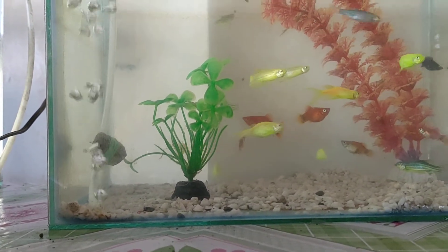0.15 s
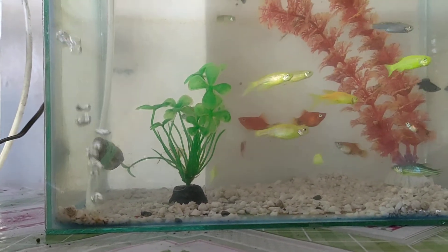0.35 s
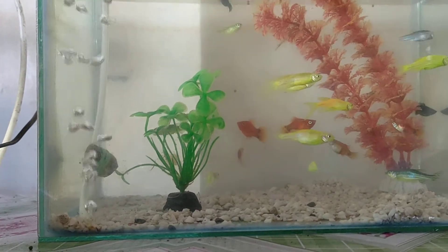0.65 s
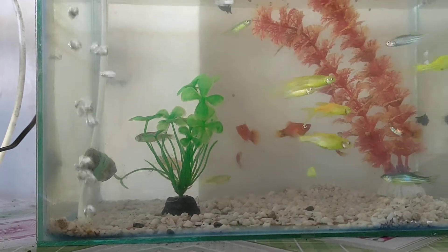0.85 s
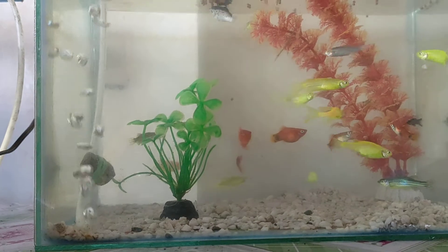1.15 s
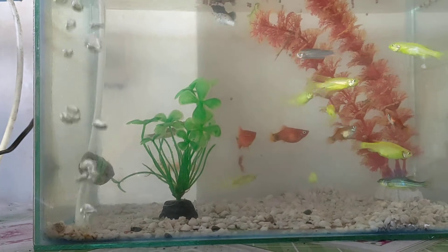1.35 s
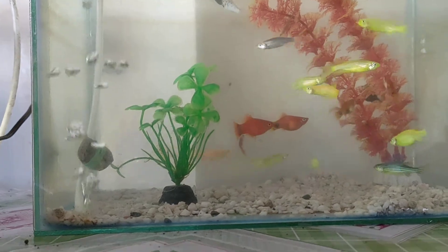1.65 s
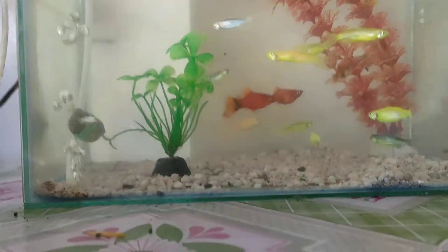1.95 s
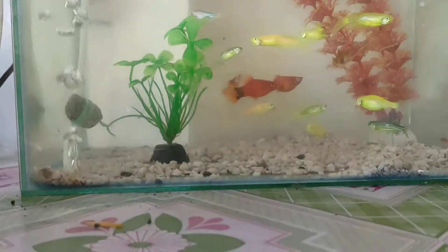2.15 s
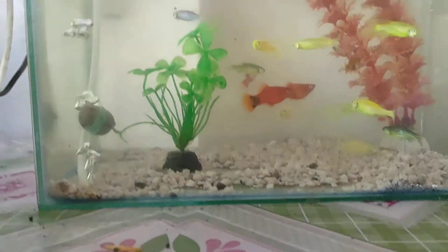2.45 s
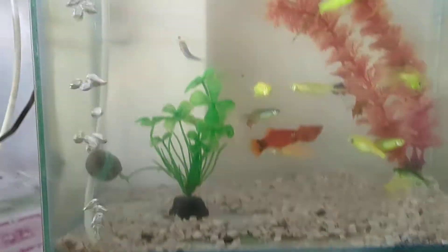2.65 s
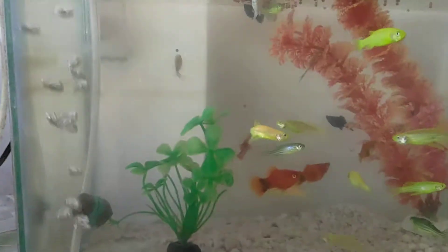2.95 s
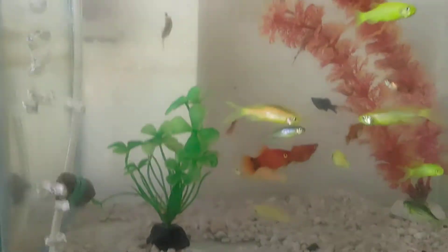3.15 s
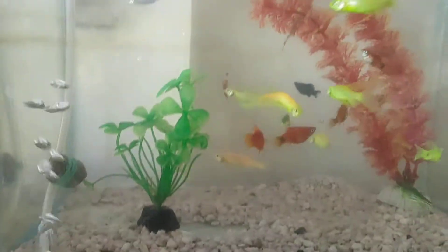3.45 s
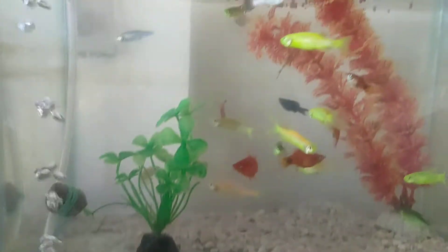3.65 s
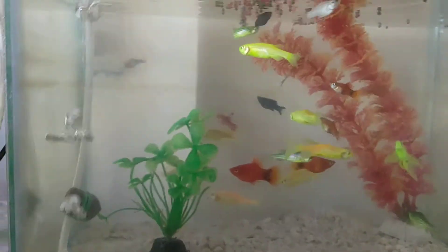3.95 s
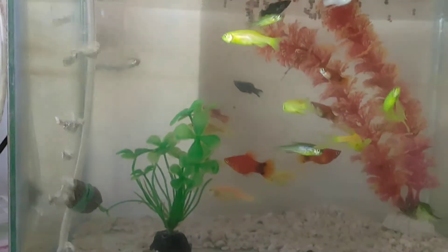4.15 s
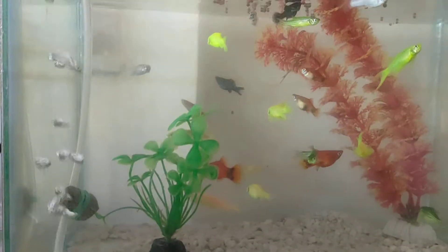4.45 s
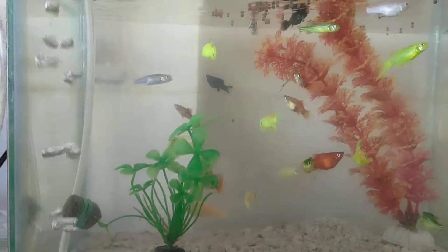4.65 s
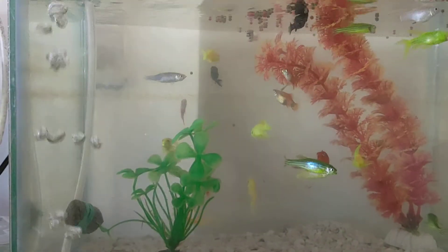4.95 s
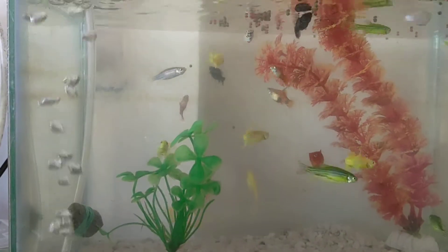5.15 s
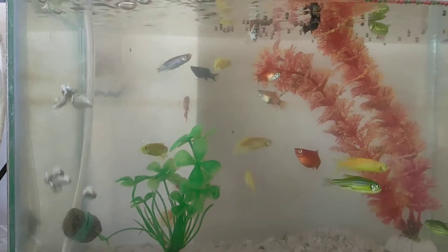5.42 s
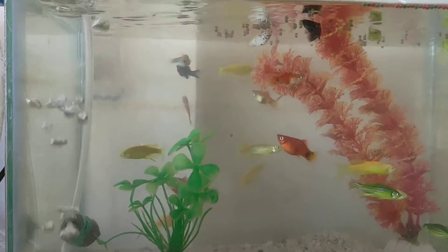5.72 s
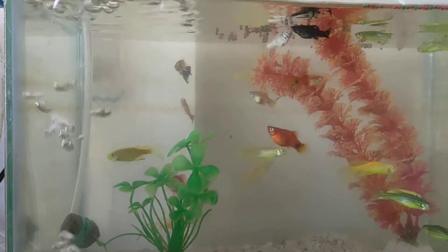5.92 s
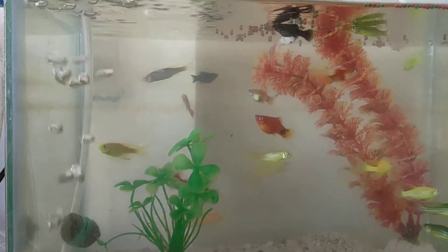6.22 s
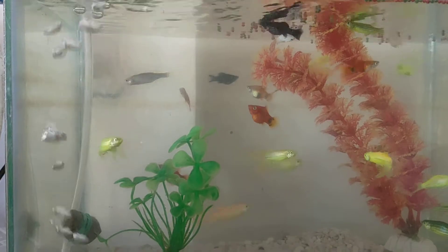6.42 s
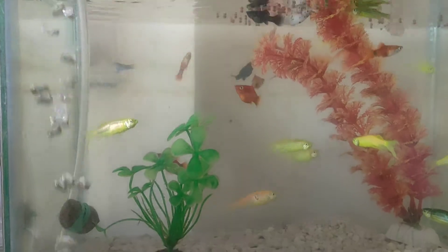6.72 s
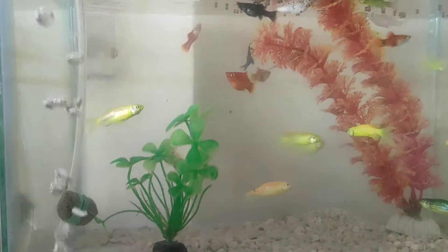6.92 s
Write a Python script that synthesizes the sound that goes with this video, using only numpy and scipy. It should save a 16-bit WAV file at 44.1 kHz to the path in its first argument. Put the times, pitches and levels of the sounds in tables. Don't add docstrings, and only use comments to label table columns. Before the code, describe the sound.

Close handheld stereo pickup at an aquarium: a constant mains-rate pump buzz dominates, with a humming casing, thin rattling shell and high valve clicking. Quiet bubbling and breathy rushing blend behind it. Several loud dry clicks from a finger on the microphone come early, the first briefly ducking the sound, and a soft last one follows around the middle. The buzz then continues, brighter and steady, to the end.

```python
import sys
import numpy as np
from scipy import signal
from scipy.fft import rfft, irfft, next_fast_len
from scipy.io import wavfile
from scipy.ndimage import uniform_filter1d

SR = 44100
rng = np.random.default_rng(int(sys.argv[2]) if len(sys.argv) > 2 else 0)


def digitize_waveform(pressure):
    field = np.atleast_2d(pressure).T
    bounded = np.clip(field, -1, 1)
    quanta = np.round(bounded * 32767).astype(np.int16)
    wavfile.write(sys.argv[1], SR, quanta)


def level_to_linear(level):
    exponent = np.asarray(level, float) / 20
    return 10 ** exponent


N = 312228

MAINS_HZ = 59.8959
START_TURN, KNOCK_TURN = -.004, -.016


def rms_one(x):
    return x / np.sqrt(np.mean(x ** 2) + 1e-20)


def at_hz(points, hz):
    point_hz, value = np.transpose(points)
    return np.interp(np.log(hz), np.log(point_hz + 1), value)


def pan(side_db):
    return level_to_linear(np.multiply.outer([.5, -.5], side_db))


def drift(rate_hz):
    r = np.exp(-80 * np.pi * rate_hz / SR)
    noise = rng.standard_normal(N // 40 + 2002)
    slow = signal.lfilter([1], [1, -2 * r, r * r], noise)[2000:]
    return np.interp(np.arange(N) / 40, np.arange(len(slow)), rms_one(slow))


# start_s, height (0 to 1), turn (-1 to 1, left is plus),
# step (0 to 1, towards the glass)
HAND_PATH = [(0.1, 0.03, .6, .02), (0.9, 0, 0.82, 0.2), (1.6, 0.14, 1, 0.16), (1.92, 0.03, 0.78, 0),
             (2.1, 0.28, 0.91, 0.1), (2.4, 0.2, -0.15, 0.2), (2.6, 0.48, -1.06, 0.2),
             (2.85, 0.43, -0.82, .7), (3.07, 0.05, -0.3, 0.93), (3.55, 0.42, -0.66, 0.93),
             (3.95, 0.76, -0.038, 0.73), (4.25, 0.83, -0.16, 0.46), (4.9, 0.89, -0.1, 0.36),
             (5.5, 0.89, -0.25, 0.28), (6.25, 0.89, -0.41, 0.3), (7.08, 1, -0.39, 0.34)]


def follows_hand(rest, per_height, per_turn, per_step):
    start_s, height, turn, step = np.transpose(HAND_PATH)
    value = rest + per_height * height + per_turn * turn + per_step * step
    return np.interp(np.arange(N) / SR, start_s, value)


def nook(x, t60_s, wet_db):
    age = np.arange(int(.12 * SR)) / SR
    tails = rng.standard_normal((2, 2, len(age))) * level_to_linear(-60 * age / t60_s) * (age > .002)
    tails /= np.sqrt(np.sum(tails ** 2, axis=2, keepdims=True))
    here, there = (signal.oaconvolve(x, tail, axes=1)[:, :N] for tail in tails)
    moved = 1.52 * np.arange(N) / SR + drift(0.28)
    wet = x + level_to_linear(wet_db) * (np.cos(moved) * here + np.sin(moved) * there)
    return wet / np.sqrt(np.mean(wet.mean(axis=0) ** 2))


def fan():
    level = np.sqrt(2) * level_to_linear(-46.5 + 0.51 * drift(1.2))
    return level * np.sin(2 * np.pi * 58.1 * np.arange(N) / SR)


def gurgle(bubbles_per_s, level_db):
    born = rng.random(N) < bubbles_per_s * level_to_linear(5 * drift(2.5)) / SR
    sizes = level_to_linear(2.0 * np.minimum(rng.exponential(1, N), 4)) * born
    pitch_group = rng.integers(0, 10, N)
    out = 0
    for k, hz in enumerate(np.geomspace(110, 700, 10)):
        r, w = level_to_linear(-60 * hz / (14.0 * SR)), 2 * np.pi * hz / SR
        hits = sizes * (pitch_group == k) + 1e-18
        out = out + signal.lfilter([0, np.sin(w)], [1, -2 * r * np.cos(w), r * r], hits)
    dull = signal.lfilter([.05], [1, -.95], out)
    return level_to_linear(level_db) * rms_one(dull)


# pitch_hz, likeness (1 same, 0 unrelated, -1 opposite)
LEFT_RIGHT_LIKENESS = [(60, 0.49), (300, 0.77), (640, 0.04), (1100, -0.82), (1600, -0.73), (2300, 0.53),
                       (4000, 0.4), (7000, -0.32), (15000, 0.29)]


def banded_noise(spectrum, low_hz, edge_count, patchy_db, patch_rate_hz):
    out, together = 0, drift(2.5)
    white = rng.standard_normal((2, 2, N))
    edges = np.geomspace(low_hz, 16000, edge_count)
    for k, (low, high) in enumerate(zip(edges, edges[1:])):
        band = signal.butter(2, [low, high], "band", fs=SR, output="sos")
        mid, side = signal.sosfilt(band, white[k % 2])
        hz = np.sqrt(low * high)
        alike = np.clip(at_hz(LEFT_RIGHT_LIKENESS, hz), -1, 1)
        flicker_db = patchy_db * (.5 * together + drift(patch_rate_hz))
        gain = level_to_linear(at_hz(spectrum, hz) + flicker_db)
        out = out + gain * (np.sqrt(1 + alike) * mid + np.sqrt(1 - alike) * side * [[1], [-1]])
    return rms_one(out)


def puffs(turns, sharp, depth, uneven_db):
    since = turns - KNOCK_TURN
    strengths = level_to_linear(uneven_db * rng.standard_normal(int(since.max()) + 2))
    strength = strengths[since.astype(int)]
    return rms_one(1 + depth * strength * np.exp(-sharp * (since % 1)))


# pitch_hz, level_db (per Hz)
RUSH_SPECTRUM = [(20, -5), (60, -6.5), (150, -13.5), (300, -0.5), (500, 1), (750, -3), (1200, -3),
                 (2200, -4), (3300, -15), (4750, -18.5), (5700, -9), (7000, -24.5), (8000, -60),
                 (16000, -56)]


def rush(turns):
    noise = banded_noise(RUSH_SPECTRUM, low_hz=19.9, edge_count=23, patchy_db=3.0, patch_rate_hz=10.2)
    level = level_to_linear(follows_hand(-33.5, -2.5, -0.6, 0.6))
    return level * noise * puffs(turns, sharp=2.0, depth=0.23, uneven_db=1.9)


# pitch_hz, width_hz, level_db
GRILLE_RESONANCES = [(7430, 65, 0), (8090, 170, -6), (9580, 170, -3), (10350, 67, -8), (10600, 77, -7),
                     (11100, 160, -12), (11860, 56, -13), (12870, 170, -13), (13600, 130, -16),
                     (15000, 160, -16)]


def grille(x):
    size = next_fast_len(N)
    hz = np.arange(size // 2 + 1) * SR / size
    power = level_to_linear(2 * -4)
    for centre_hz, width_hz, _ in GRILLE_RESONANCES:
        power = power + 1 / (1 + (2 * (hz - centre_hz) / width_hz) ** 4)
    return rms_one(irfft(rfft(x, size) * np.sqrt(power), size)[:, :N])


# pitch_hz, level_db (per Hz)
SPIT_SPECTRUM = [(6500, 1), (7600, 6.5), (9100, -13), (9700, 4), (10700, -1.5), (11800, -7.5),
                 (12900, -2.5), (14300, -20), (15200, -10), (16000, -20)]


def spit(turns):
    noise = banded_noise(SPIT_SPECTRUM, low_hz=6560, edge_count=13, patchy_db=1.6, patch_rate_hz=6)
    depth = level_to_linear(follows_hand(1.9, 12.3, .1, 3.8))
    level = level_to_linear(follows_hand(-50, -8, 1.3, 3.5))
    return level * grille(noise) * puffs(turns, sharp=10.4, depth=depth, uneven_db=4.0)


# start_s, peak_db, pitch_hz, side_db (left minus right), dip_db (gain control)
FINGER_TICKS = [
    (0.2333, -0.5, 2034, 20, 7.5),
    (.4034, -1, 3570, 31, 2),
    (.4628, -17, 3500, 8, -0.5),
    (0.8547, -4.5, 1430, 25, 0.2),
    (.8561, -18, 1080, 19, -0.5),
    (1.603, -29, 3870, 16, 0),
    (1.6833, -5, 3300, 22, -0.2),
    (2.034, -12.5, 3800, 5, -1.1),
    (2.442, -12, 3800, 11, -1),
    (3.539, -20, 4000, 6, -0.5),
]


def ticks():
    out, t = np.zeros((2, N)), np.arange(N) / SR
    for start_s, peak_db, hz, side_db, _ in FINGER_TICKS:
        i = slice(int((start_s - .003) * SR), int((start_s + .004) * SR))
        cycles = (t[i] - start_s) * hz - .5
        crack = level_to_linear(-13.5) * np.exp(-(cycles / .5) ** 2) * rng.standard_normal(len(cycles))
        push = 1.2 * np.exp(-(cycles / .42) ** 2) * np.sin(2 * np.pi * cycles)
        tick = push + signal.lfilter([.3], [1, -.7], crack)
        out[:, i] += level_to_linear([[peak_db], [peak_db - side_db]]) * tick
    return out


def gain_control():
    t, dip_db = np.arange(N) / SR, np.zeros(N)
    for start_s, _, _, _, tick_dip_db in FINGER_TICKS:
        age = np.abs(t - start_s)
        dip_db += tick_dip_db * (t > start_s) * (np.exp(-age / 0.14) + np.exp(-age / .008))
    return level_to_linear(-uniform_filter1d(dip_db, size=88))


# order (times the mains), left_db, right_db, left_lead_rad
HUM_ORDERS = [(1, -58, -56, 0), (2, -38, -39, .15), (3, -47, -39, -.5), (4, -43, -43, 1.1),
              (5, -45, -49, .2), (6, -34, -35, .9), (7, -38, -37, .65), (8, -25, -26, .65),
              (9, -26, -24, .6), (10, -37, -37, 1.4), (11, -41, -38, 2.3), (12, -55, -49, 3.9),
              (13, -53, -60, -1), (14, -41, -51, 1.8), (15, -47, -47, 2.8), (16, -46, -41, 1.4),
              (17, -46, -48, 3.1), (18, -45, -44, 3.1), (19, -50, -50, 3.1), (20, -59, -59, 3.1),
              (21, -57, -57, 3.1), (22, -50, -47, 2.9), (23, -49, -52, 3.1), (24, -59, -57, 3.6)]


def hum(turns):
    out = np.zeros((2, N))
    main = level_to_linear(follows_hand(0.61, -0.51, 0.63, -0.89))
    flank = level_to_linear(follows_hand(-5, 2, -0.7, 9.5))
    low = level_to_linear(follows_hand(-1.5, -1.1, -0.3, 4.2))
    swells = {2: low, 10: flank, 11: flank, 16: flank, 18: flank, 19: flank}
    for order, left_db, right_db, left_lead_rad in HUM_ORDERS:
        hz = order * MAINS_HZ
        lag = 0
        for cavity_hz, width_hz in [(452, 18), (575, 30)]:
            lag += np.pi / 2 + np.arctan(2 * (hz - cavity_hz) / width_hz)
        angle = 2 * np.pi * order * turns - 2.3 - lag + 0.097 * drift(11)
        swell = np.sqrt(2) * swells.get(order, main)
        out[0] += swell * level_to_linear(left_db) * np.cos(angle)
        out[1] += swell * level_to_linear(right_db) * np.cos(angle - left_lead_rad)
    return out


# after_knock_turns, casing_db, valve_db, tilt_db (per octave)
STROKE_CONTACTS = [
    (0, 1.5, -0.5, 15),
    (-.19, -2, -31, -18),
    (-.08, -5.5, -6.5, -19),
    (.2, -3, -6.5, -0.5),
]


def knocks(modes, column, tilt_db, centre_hz, jitter_us, uneven_db, rise_s):
    strokes = np.arange(-2, int(N / SR * MAINS_HZ) + 2)
    age, pad = np.arange(1000) / SR, 3000
    out = np.zeros((2, N + 8000))
    hz, level_db, t60_s, side_db = np.transpose(modes)
    decay = np.log(1000) / np.minimum(t60_s, .024)
    rings = np.exp(np.outer(2j * np.pi * hz - decay, age))
    rings = rings * (1 - np.exp(-age / rise_s)) ** 2
    ports = pan(side_db) * np.exp(1.7j * np.outer([0, 1], hz < 1950))
    jitter_s = jitter_us[np.clip(strokes * SR / MAINS_HZ, 0, N - 1).astype(int)] / 1e6
    for contact in STROKE_CONTACTS:
        chance = rng.standard_normal((len(strokes), 2 + len(modes)))
        when_s = (strokes + KNOCK_TURN - START_TURN + contact[0]) / MAINS_HZ + jitter_s * chance[:, 0]
        when = when_s * SR
        start = np.ceil(when).astype(int)
        slope_db = tilt_db[np.clip(start, 0, N - 1)] + contact[3]
        tilt = slope_db[:, None] * np.log2(hz / centre_hz)
        uneven = uneven_db * (chance[:, 1:2] + chance[:, 2:])
        gains = level_to_linear(contact[column] + level_db + tilt + uneven)
        gains = gains * np.exp(2j * np.pi * np.outer(start - when, hz) / SR)
        for port, late in enumerate([0, 20]):
            waves = np.imag(gains * ports[port] @ rings)
            for i, wave in zip(start + pad + late, waves):
                out[port, i:i + len(age)] += wave
    lowpass = signal.butter(6, 7300, fs=SR, output="sos")
    return signal.sosfilt(lowpass, out[:, pad:pad + N])


def steady_jitter_us():
    return follows_hand(20, .1, .1, .1)


# pitch_hz, level_db, t60_s (time to die 60 dB), side_db (left minus right)
SHELL_RINGS = [(3064, -7, 0.033, 3), (3315, 3.5, 0.02, -1), (3586, -1, 0.025, 1.5), (3930, 0, .035, 1),
               (4142, 2, 0.034, 3.5), (4356, -5, 0.039, 9), (4520, -12, 0.014, 7)]


def shell():
    rung = knocks(SHELL_RINGS, column=1, tilt_db=np.zeros(N), centre_hz=3800,
                  jitter_us=steady_jitter_us(), uneven_db=2.0, rise_s=0.00023)
    return nook(rung, t60_s=0.042, wet_db=2.5) * level_to_linear(follows_hand(-44.5, -2, 0.7, 4))


# pitch_hz, level_db, t60_s (time to die 60 dB), side_db (left minus right)
VALVE_RINGS = [(4960, -24, 0.012, 0), (5380, -5, 0.018, -12.5), (5507, -.5, 0.024, -13),
               (5793, 0, 0.03, -0.5), (5800, 2, 0.022, 0), (5915, -2, 0.038, 4), (5950, -4, 0.01, 8),
               (6145, -5, 0.027, 8), (6360, -9, 0.019, -9), (7420, -24, 0.024, -1)]


def valve():
    rung = knocks(VALVE_RINGS, column=2, tilt_db=follows_hand(-51, 75, 3, 22), centre_hz=5680,
                  jitter_us=follows_hand(14, 40, .1, .1), uneven_db=2.5, rise_s=0.00023)
    wet = nook(rung, t60_s=0.11, wet_db=follows_hand(-0.5, -10, -0.3, 2))
    return wet * level_to_linear(follows_hand(-36, 2.2, .9, -0.7)) * pan(follows_hand(4.9, 4.4, 2.5, 0.36))


# pitch_hz, level_db, t60_s (time to die 60 dB), side_db (left minus right)
CASING_RINGS = [(1430, -20, 0.035, -6.5), (1730, -33, 0.0048, 3.5), (1774, 1, 0.046, 5.5),
                (1933, 0, 0.026, -14.5), (2081, -2, 0.02, -8), (2162, 0.5, 0.02, -4.5),
                (2225, 5.5, 0.028, 5.5), (2343, 1, 0.021, -4.5), (2628, -3, 0.024, -2),
                (2775, -9, .02, -3.5)]


def casing():
    rung = knocks(CASING_RINGS, column=1, tilt_db=follows_hand(-21.5, 47.5, .1, 2.5), centre_hz=2139,
                  jitter_us=steady_jitter_us(), uneven_db=1.5, rise_s=0.00067)
    wet = nook(rung, t60_s=0.08, wet_db=follows_hand(-9.5, -1.5, 0.5, 2.2))
    return wet * level_to_linear(follows_hand(-32.5, 2, -0.6, 0.6)) * pan(follows_hand(.1, .1, 9.1, .1))


def scene():
    turns = MAINS_HZ * np.arange(N) / SR + START_TURN
    background = fan() + gurgle(bubbles_per_s=60, level_db=-47.5)
    air = rush(turns) + spit(turns)
    pump = hum(turns) + shell() + valve() + casing()
    return (background + air + pump) * gain_control() + ticks()


def low_pass(x):
    return signal.sosfilt(signal.butter(12, 15720, fs=SR, output="sos"), x)


def record(dry):
    mix = np.clip(dry, -.88, .88)
    return low_pass(mix)


dry = scene()
out = record(dry)
digitize_waveform(out)
```